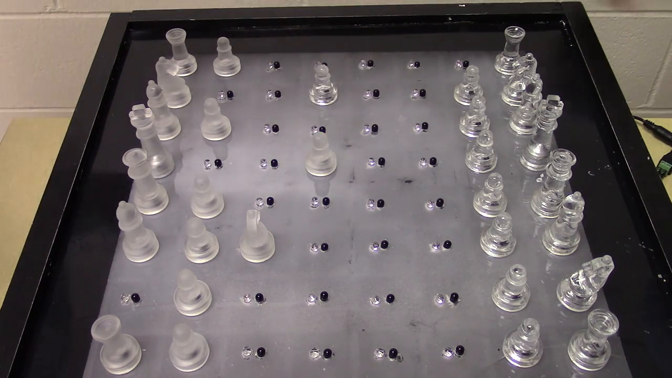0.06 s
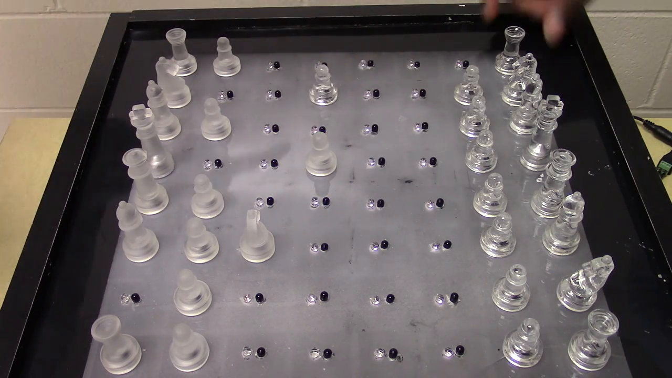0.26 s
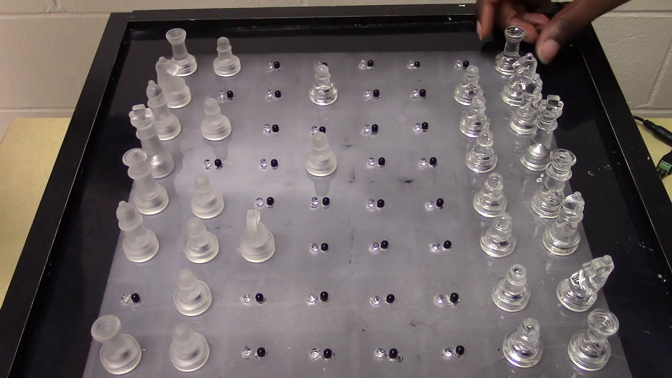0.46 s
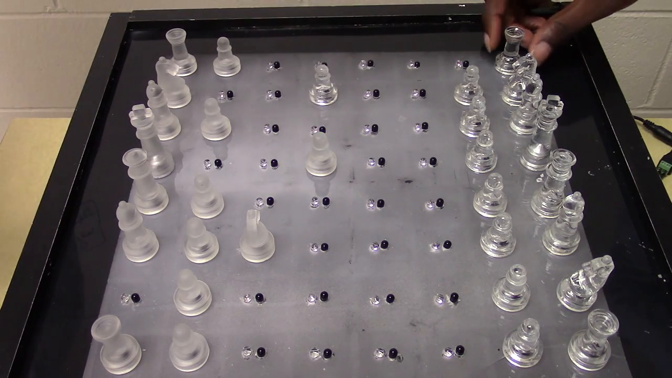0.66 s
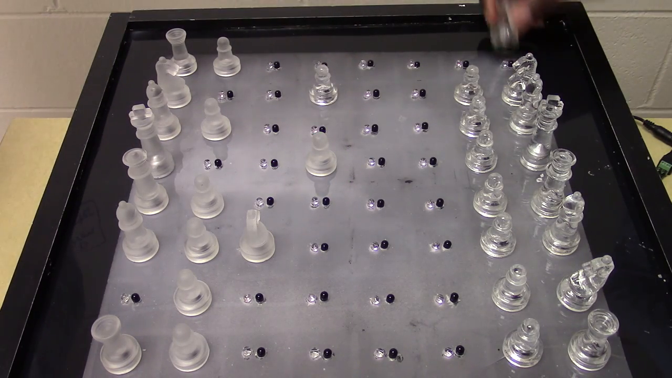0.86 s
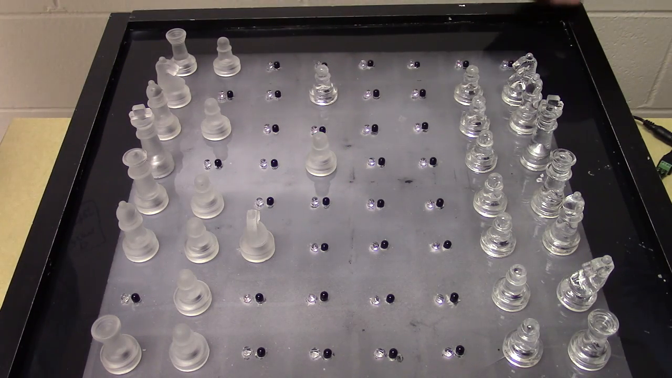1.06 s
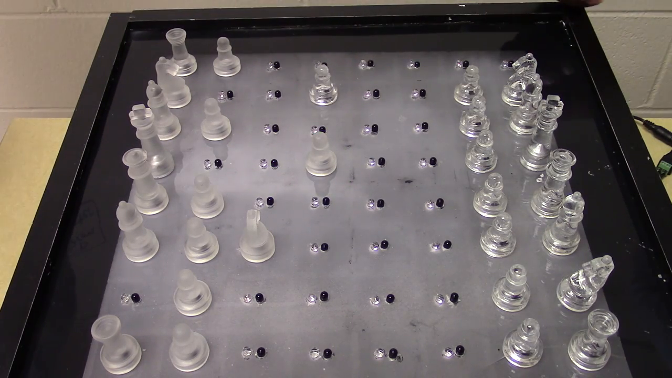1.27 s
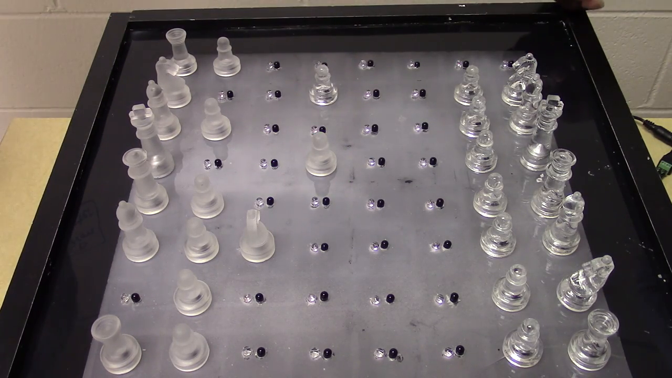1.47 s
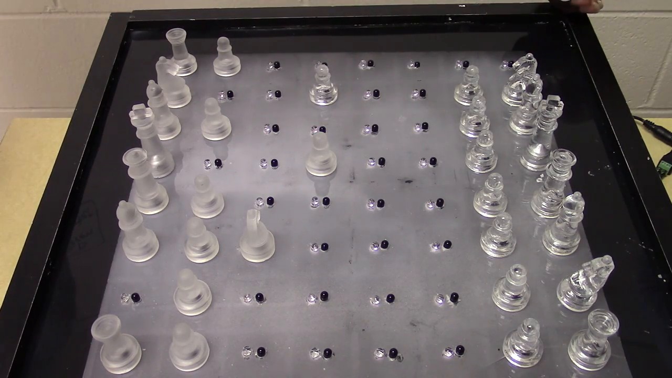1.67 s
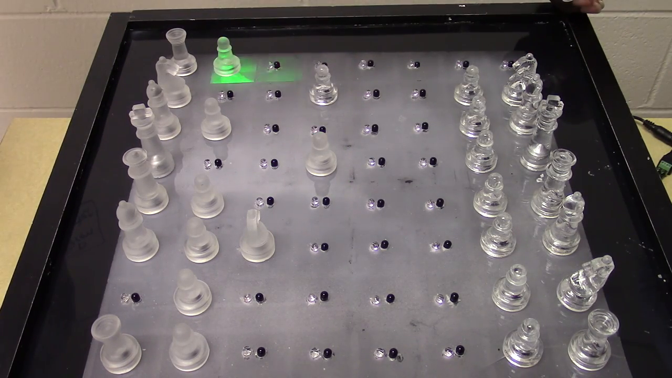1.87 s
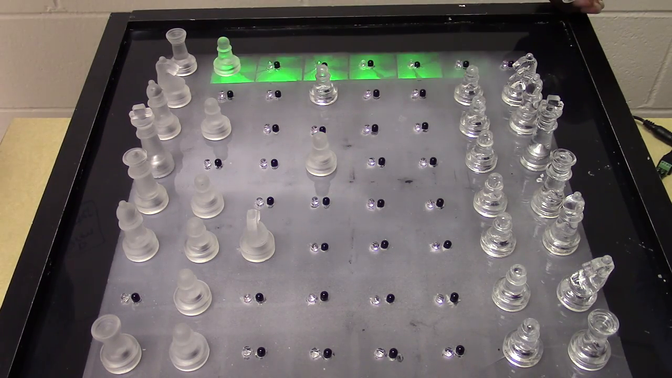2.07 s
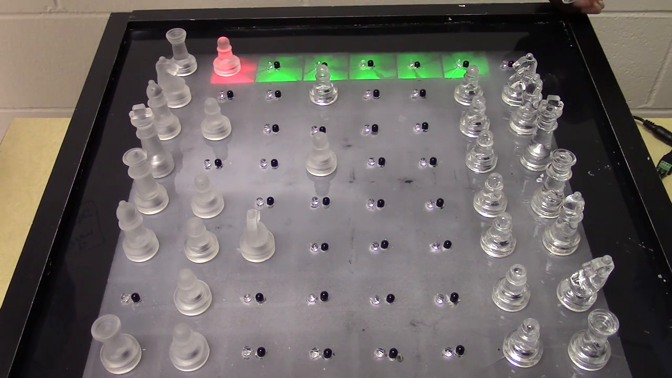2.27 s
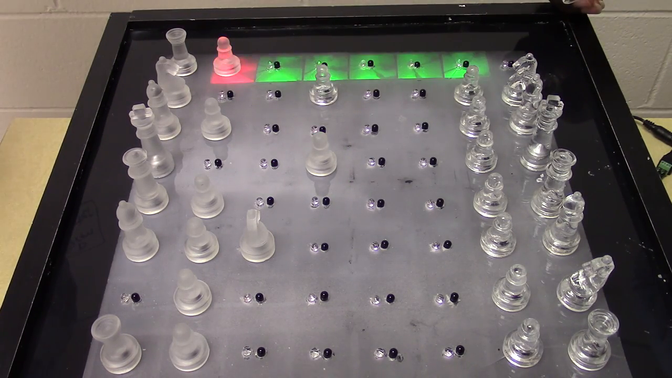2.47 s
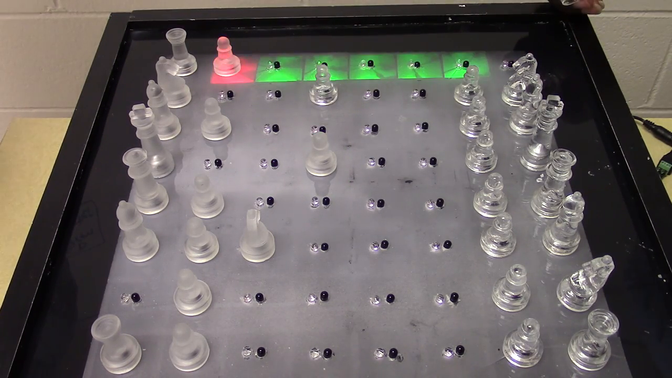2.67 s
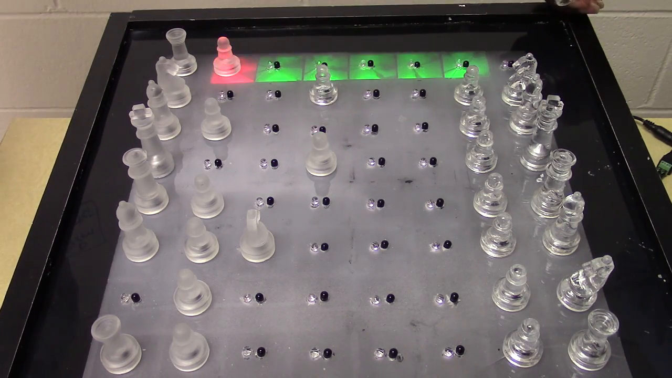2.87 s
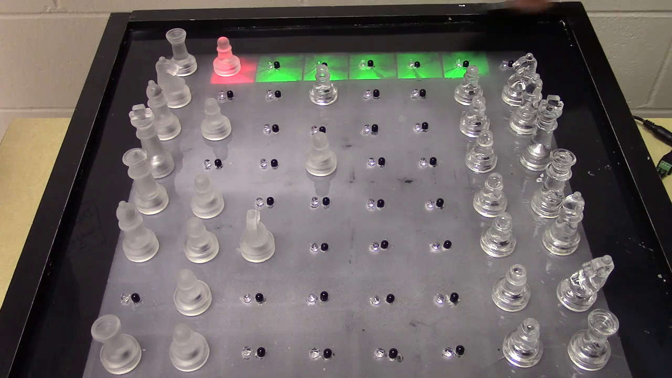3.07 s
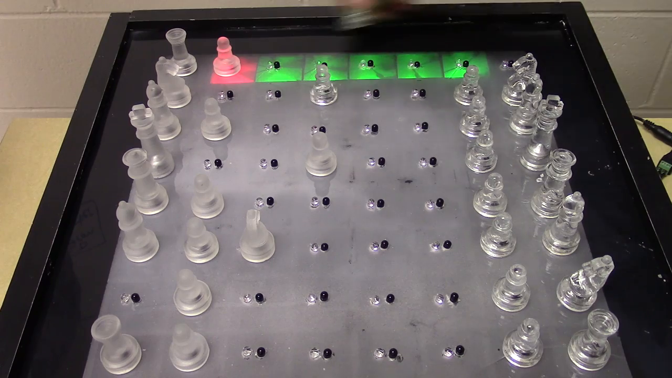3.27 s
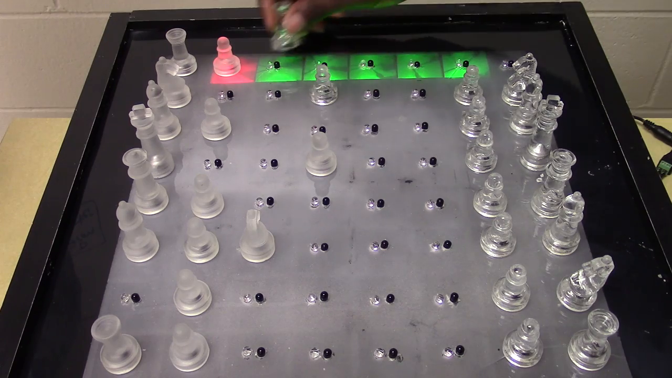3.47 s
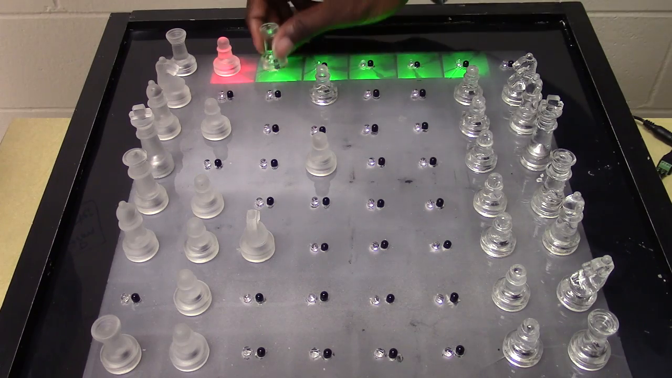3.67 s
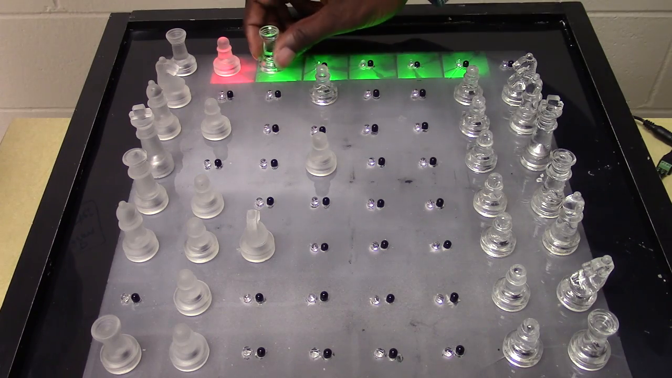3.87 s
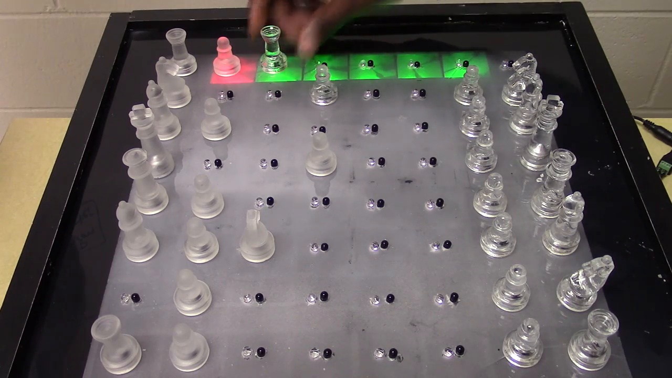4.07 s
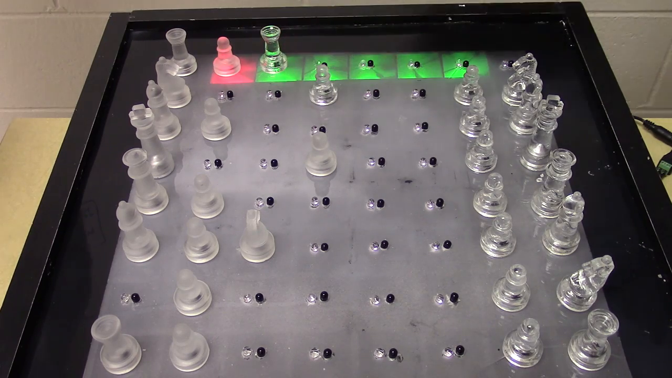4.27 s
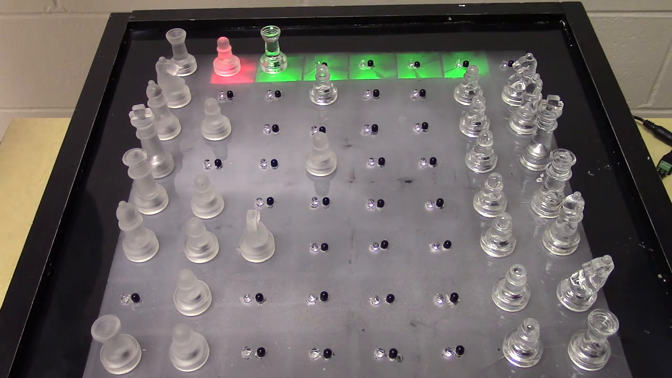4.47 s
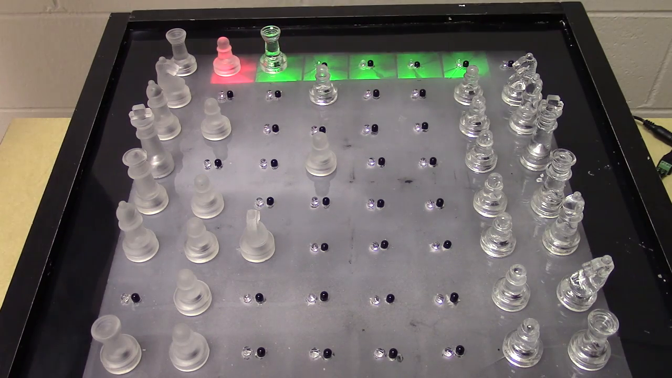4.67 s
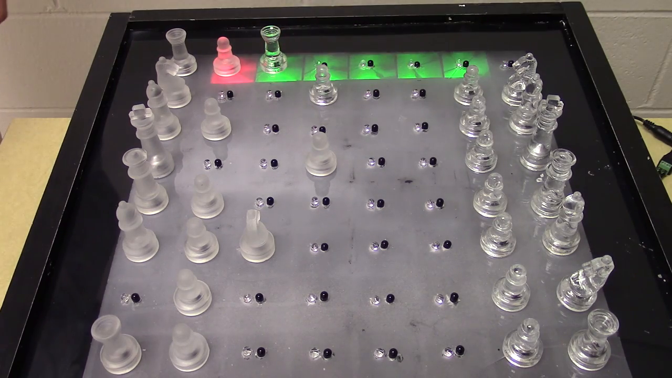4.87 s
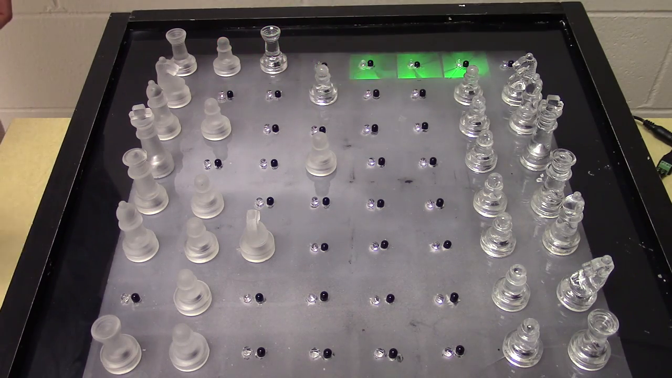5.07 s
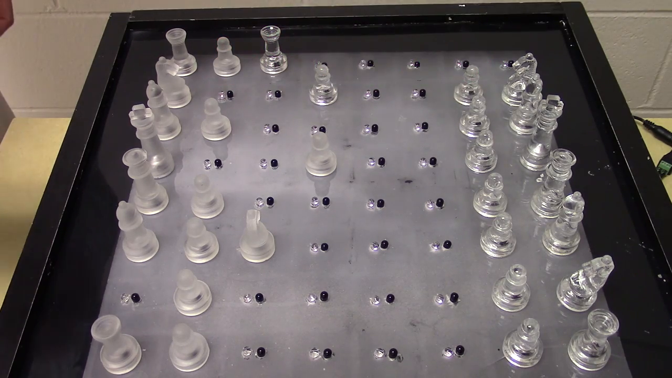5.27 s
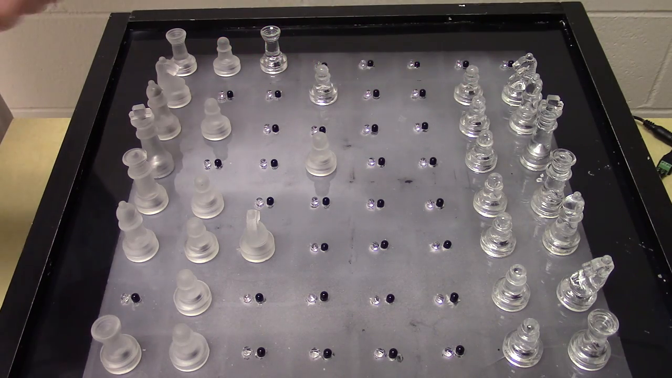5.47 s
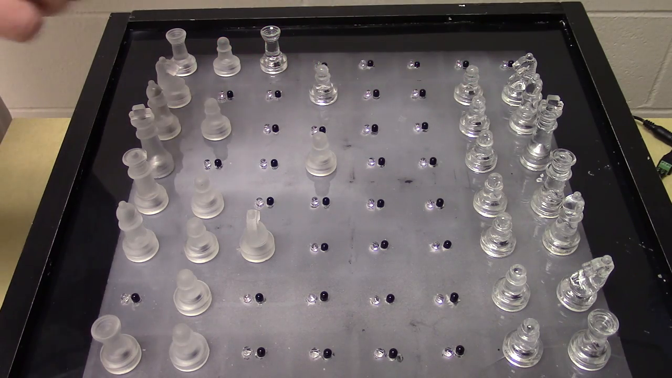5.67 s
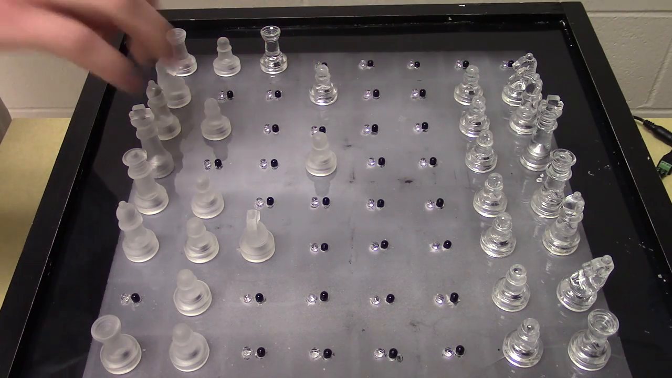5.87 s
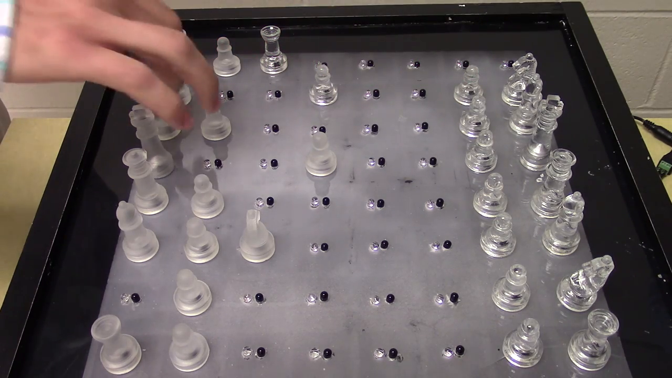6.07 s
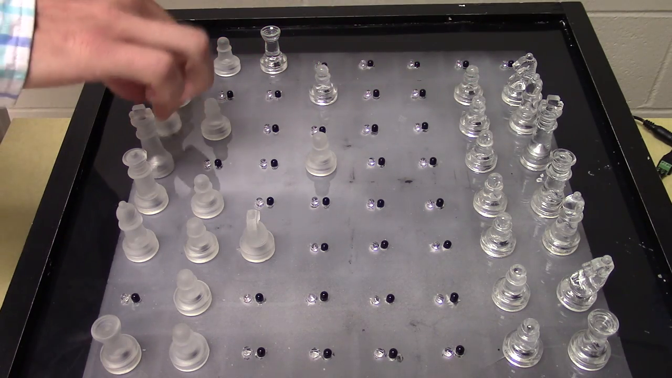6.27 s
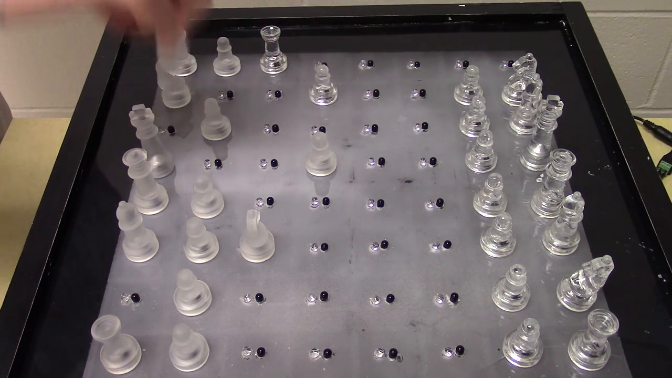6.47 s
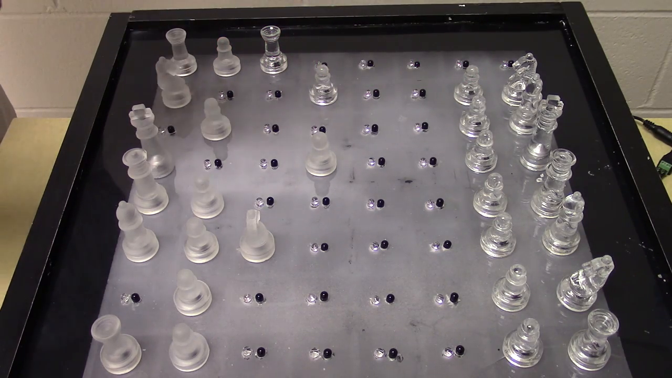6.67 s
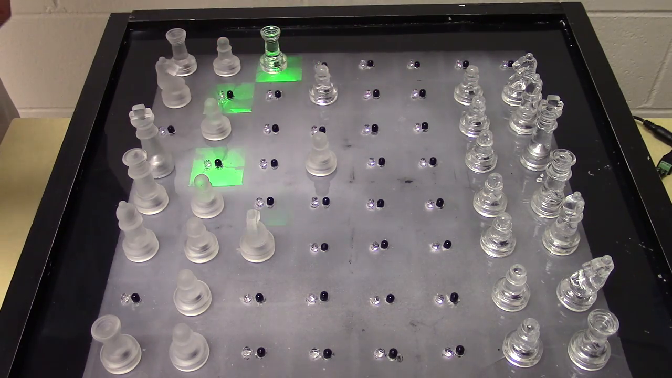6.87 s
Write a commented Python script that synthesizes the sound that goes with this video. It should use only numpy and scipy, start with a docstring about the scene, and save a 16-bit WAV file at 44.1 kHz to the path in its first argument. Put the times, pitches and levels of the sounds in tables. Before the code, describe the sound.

Glass chess piece taps softly, then lands with a sharp hard knock and rocks once; later knocks chatter over room hum and faint sleeve rustle.

```python
"""A glass rook is lifted, set down hard on a glass-topped electronic chess board and rocks once; later
another piece knocks and chatters as it is picked up. Sleeves rustle and small ticks come and go over
mains hum and ventilation in a small room. The knocks are damped modes plus a noisy crack of glass;
handling is short scratchy noise, cloth is shaped noise with a high whistle on quick flicks,
hum is wavering sine lines and the ventilation is shaped noise."""
import sys
import numpy as np
from scipy import signal
from scipy.fft import rfft, irfft
from scipy.io import wavfile

SR = 44100
rng = np.random.default_rng(int(sys.argv[2]) if len(sys.argv) > 2 else 0)


def waveform_to_disk(signal):
    """Save audio, clipped to [-1, 1], as 16-bit WAV at the path in sys.argv[1]."""
    frames = np.transpose(np.atleast_2d(signal))
    scaled = np.clip(frames, -1, 1) * 32767
    samples = np.round(scaled).astype(np.int16)
    wavfile.write(sys.argv[1], SR, samples)


N = 305172  # length in samples
TIME = np.arange(N) / SR
FREQ = np.fft.rfftfreq(N, 1 / SR) + 1e-3  # kept off zero for division

# Colour of ventilation and hiss. Each row: frequency in Hz, relative density in dB per Hz.
AIR_COLOUR = [(25, -33), (50, -19), (92, -22), (112, -1), (170, 1.5), (240, -1.5), (275, -5.5), (360, -5),
              (500, -12), (720, -16), (1000, -20.5), (2500, -26), (8000, -36.5), (15000, -46)]
AIR_DB = -49.5
# Ventilation's side against mid. Each row: frequency in Hz, gain in dB.
AIR_WIDTH = [(30, -11), (60, -2.5), (120, -29), (220, -17.5), (310, -14.5), (450, -9.5), (1000, -6),
             (4000, -9.5), (12000, -13)]
# Mains and fan lines. Each row: frequency in Hz, rms level in dB, waver from 0 to 1.
HUM_LINES = [(58.4, -74.5, 0.9), (119.8, -56.5, 0.76), (229, -56, 0.99), (346, -66.5, 0.59),
             (441, -73, 0.87), (637, -66, 0.97)]

# Colour of cloth on cloth. Each row: frequency in Hz, relative density in dB per Hz.
CLOTH_COLOUR = [(200, -10), (500, 4), (1000, -1), (2000, -6), (3600, -10), (6000, -14.5), (11000, -18.5),
                (15500, -30)]
# Slow arm movements that rub a sleeve. Each row: start in seconds, length in seconds, level in dB.
SLEEVE_RUBS = [(0, 1.29, -62.5), (1.462, 0.36, -61), (2.74, 0.11, -61), (3.06, 0.41, -61),
               (4.346, 0.93, -58.5), (4.795, 0.075, -51)]
RUB_ATTACK_S, RUB_RELEASE_S = 0.021, 0.13
# Threads snagging in the rub: band, level against the rub, spread of their sizes.
SNAG_HZ, SNAG_WIDTH_HZ, SNAG_DB, SNAG_SPREAD_DB = 3380, 2600, -13, 4
# Colour of the weave swishing. Each row: frequency in Hz, relative density in dB per Hz.
SWISH_COLOUR = [(2000, 2), (7000, -1), (11500, -2), (14000, -5), (15500, -13)]
# Quick flicks of the arm. Each row: fastest moment in seconds, half length in seconds, level in dB,
# whistle pitch at the fastest in Hz, whistle level in dB relative to the flick.
ARM_FLICKS = [(1.11, 0.056, -65.5, 11900, -9), (2.817, 0.097, -63.5, 11300, -20),
              (3.068, .045, -60.5, 12100, -18), (3.222, 0.055, -62, 10900, -2),
              (3.318, 0.045, -56.5, 11350, -6)]

# Lone dry ticks of handling. Each row: start in seconds, length in seconds to half amplitude after
# a level in dB, then centre in Hz and the answer of the board's case in dB against the tick.
# The order within a row is start, level, length, centre, answer.
HANDLING_TICKS = [(0.336, -64.5, 0.021, 6000, 4), (0.827, -54, .0033, 2850, 2), (1.512, -51, .004, 7200, 1),
                  (3.032, -54, .0035, 6000, 0), (4.136, -55, 0.0087, 5530, -0.5),
                  (5.024, -60, .008, 3200, 2), (5.196, -49, 0.0049, 9300, 2)]
TICK_WIDTH = 0.44  # bandwidth as a share of the centre
CASE_HZ, CASE_WIDTH_HZ = 1410, 700
# Faint scratchy pairs, like a small button pressed and let go. Each row: press in seconds,
# time held in seconds, press level in dB, release level in dB.
BUTTON_PRESSES = [(1.158, 0.11, -59.5, -60.5), (1.840, 0.096, -65, -60), (3.931, 0.11, -60, -61),
                  (4.266, .074, -62, -63), (6.761, 0.11, -59.5, -62.5)]
BUTTON_HZ, BUTTON_WIDTH_HZ, BUTTON_S, BUTTON_TOP_HZ = 6300, 3000, 0.023, 12000
# Something sliding on the board. Each row: start in seconds, length in seconds, level in dB,
# centre in Hz, width in Hz.
BOARD_SCUFFS = [(0.777, 0.052, -62, 2240, 260), (5.208, .05, -52.5, 560, 400),
                (5.211, 0.033, -59.5, 3000, 3000)]

# Glass on the board. Each row: start in seconds, level in dB, low-pass brightness in Hz, high-pass
# corner in Hz, ring of the struck spot in Hz and its dB, lower ring of the piece in Hz and its dB,
# upper ring in Hz and its dB, t60 of both piece rings in seconds, glass crack in dB,
# change per rebound in dB.
GLASS_KNOCKS = [ (0.8420, -30.5, 3700, 640, 815, 16.5, 2460, -10, 2990, -14, .018, -14.5, -11.5),
                (3.7460, -5.5, 10900, 68, 947, 3.5, 1533, -14, 3250, -2.5, 0.0055, -10, -21),
                (3.8194, -18, 9050, 205, 890, 5.5, 1900, -19, 3120, -10.5, 0.018, -11, -31),
                (3.8283, -37, 1700, 450, 930, 13, 1550, -3, 3150, -7, .005, -23, -20),
                (3.946, -50.5, 1800, 750, 1040, 17, 1800, -6, 2500, -6, .005, -8, -15),
                (4.0581, -40.5, 2400, 500, 885, 12, 1790, -10, 2400, 1, .005, -19, -15.5),
                (5.2095, -44.5, 1300, 430, 557, 17, 825, 16, 2400, -2, 0.0068, -7, -9),
                (6.2588, -30, 1990, 678, 1339, 11.5, 743, -3, 1779, 9, .004, -13.5, -26),
                (6.2635, -46, 1200, 450, 710, 16.5, 950, 4, 2400, -6, .008, -2, -16),
                (6.3320, -29.5, 2960, 1050, 1070, 14, 1664, 5.5, 2520, 6, 0.0064, -15, -20),
                (6.3427, -46, 2600, 800, 1140, 15, 1750, -4, 2400, 3, .006, -20, -20),
                (6.3543, -39, 2380, 900, 1030, 18, 1740, 6, 2400, 1, .005, -11, -26),
                (6.3606, -38.5, 2400, 800, 1100, 14, 1750, 3, 2400, -4, .005, -17, -16),
                (6.3652, -43.5, 2400, 700, 980, 10, 1670, 16, 2390, 9, .005, -13, -20),
                (6.3686, -46.5, 2200, 700, 1130, 17.5, 1700, -4, 2400, -2, .005, -23, -4.5)]
# Modes of the board with a piece on it. Each row: frequency in Hz, level in dB, t60 in seconds.
BOARD_MODES = [(165, -15.5, 0.057), (234, -13, 0.038), (601.4, -5.5, 0.041), (626, 2.2, 0.0093),
               (771, -19, 0.06), (872, -17.5, 0.02), (1088, -11, 0.035), (1244, -9, 0.031),
               (1310, -24, 0.025), (1530, -7.5, 0.021), (1880, -16, 0.023), (2249, -29, 0.015),
               (2570, -25, 0.012), (2780, -30, 0.03), (3290, -20, 0.019), (3255, -5.5, 0.0073),
               (3830, -18, 0.018), (3750, -22, 0.015), (4400, -32.9, 0.011), (4800, -33.8, 0.014),
               (5180, -28, 0.017), (5764, -36, 0.012), (7760, -19.2, 0.01), (8370, -27, 0.012)]
SPOT_T60_S = 0.0097
# Colour of the crack of glass on glass. Each row: frequency in Hz, gain in dB.
CRACK_COLOUR = [(300, -40), (1000, -10), (2200, 6), (3500, 2.5), (4500, -2.5), (5700, -6), (6900, -14.5),
                (7900, -11.5), (11000, -11.5), (14000, -20), (16000, -29)]
# The snap at the first instant of contact; its level adds to that of the crack.
SNAP_HZ, SNAP_DB, SNAP_T60_S = 3060, 6, 0.002
# What the raised frame scatters back. Each row: frequency in Hz, gain in dB.
FRAME_SCATTER = [(200, -17), (450, -10), (850, -16), (1300, -11.5), (2300, -12), (3300, -15.5), (5000, -17),
                 (10000, -21)]
# Chatter: first gap, each gap against the one before, log spread of the gaps and of the spot's pitch.
REBOUND_S, REBOUND_SHRINK, REBOUND_SPREAD, SPOT_SPREAD = 0.0067, 0.86, 0.091, 0.11
REST_DB = -57.5  # below this level the piece has come to rest

# The room's answer. Each row: band centre in Hz, level in dB, t60 in seconds.
ROOM_BANDS = [(170, -12, 0.73), (390, -4, 0.65), (600, -12, 0.8), (850, -17, .65), (1200, -16.5, 0.58),
              (2110, -13.5, 0.6), (3330, -23, 0.52), (4800, -21, 0.52), (8000, -20, 0.33),
              (14000, -20, .15)]
# A low standing wave that booms on after a hard knock.
BOOM_HZ, BOOM_DB, BOOM_T60_S = 161.8, -58.5, 0.89
WALL_S, WALL_DB = 0.0095, -20.5  # early echo
# Close sounds, side against mid. Each row: frequency in Hz, gain in dB.
NEAR_WIDTH = [(100, -49), (320, -57), (600, -59), (1200, -31), (3000, -25), (12000, -18)]
TOP_HZ = 15700


def undb(db):
    """Decibels to gain."""
    return 10 ** (np.asarray(db) / 20)


def unit(x):
    """Scale to rms 1."""
    return x / np.sqrt(np.mean(x ** 2))


def colour(x, points):
    """Shape a sound's spectrum by (Hz, dB) points, joined along log frequency."""
    hz, db = np.transpose(points)
    f = np.fft.rfftfreq(len(x), 1 / SR) + 1e-3
    gain = undb(np.interp(np.log(f), np.log(hz), db))
    return irfft(rfft(x) * gain, len(x))


def edge(x, hz, kind, order=2):
    """Causal low-pass or high-pass."""
    return signal.sosfilt(signal.butter(order, hz, kind, fs=SR, output="sos"), x)


def band_noise(hz, width_hz):
    """Noise in one steep-sided resonance, rms 1."""
    detuning = (FREQ - hz ** 2 / FREQ) / width_hz
    return unit(irfft(rfft(rng.standard_normal(N)) / (1 + detuning ** 2), N))


def fade(t, t60):
    """Exponential decay, 60 dB down at t60."""
    return np.exp(-np.log(1000) * t / t60)


def ring(t, hz, db, t60):
    """One damped mode."""
    return undb(db) * np.sin(2 * np.pi * hz * t) * fade(t, t60)


def burst(length, t60, start=0):
    """A dying cluster of random reflections with unit energy."""
    t = np.arange(length) / SR
    x = rng.standard_normal(length) * fade(t, t60) * (t >= start)
    return x / np.linalg.norm(x)


def scratch(length, hz, width_hz, grit=0.82):
    """Resonant noise with grains of uneven size, falling to half amplitude at its length in seconds."""
    t = np.arange(SR // 8) / SR
    noise, size = rng.standard_normal((2, len(t)))
    b, a = signal.iirpeak(hz, hz / width_hz, fs=SR)
    rasp = unit(signal.lfilter(b, a, noise * np.exp(grit * size)))
    return rasp / (1 + (t / length) ** 4)


def add(track, s, sound):
    """Mix a sound into a track at time s."""
    i = int(s * SR)
    track[i:i + len(sound)] += sound[:N - i]


def air():
    """Ventilation rumble running out into hiss, as shaped noise."""
    return undb(AIR_DB) * unit(colour(rng.standard_normal(N), AIR_COLOUR))


def hum(waver_hz=5.1):
    """Mains and fan lines: steady sines mixed with narrow noise, so strength and phase waver."""
    out = np.zeros(N)
    for hz, db, waver in HUM_LINES:
        steady = np.sqrt(2) * np.sin(2 * np.pi * (hz * TIME + rng.random()))
        wavering = band_noise(hz, 2 * waver_hz)
        out += undb(db) * (np.sqrt(1 - waver ** 2) * steady + waver * wavering)
    return out


def sleeves(catch_db=0.6, swish_db=-4, whistle_width_hz=1100, whistle_bend=0.02):
    """Cloth rubs broadly and catches unevenly; a quick flick makes the weave swish and whistle high up."""
    power = np.zeros(N)
    for s, length, db in SLEEVE_RUBS:
        attack = 1 - np.exp(-np.maximum(TIME - s, 0) / RUB_ATTACK_S)
        release = np.exp(-np.maximum(TIME - s - length, 0) / RUB_RELEASE_S)
        power += (undb(db) * attack * release) ** 2
    snag_sizes = undb(SNAG_SPREAD_DB * band_noise(95, 200))
    snags = unit(band_noise(SNAG_HZ, SNAG_WIDTH_HZ) * snag_sizes)
    cloth = unit(colour(rng.standard_normal(N), CLOTH_COLOUR))
    out = (cloth + undb(SNAG_DB) * snags) * np.sqrt(power)

    swish = undb(swish_db) * unit(colour(rng.standard_normal(N), SWISH_COLOUR))
    unevenness = unit(edge(rng.standard_normal(N), whistle_width_hz / 2, "low"))
    for s, half_s, db, hz, whistle_db in ARM_FLICKS:
        # the arm speeds up and slows down; threads pass each other at a nearly even rate
        speed = 1 / (1 + np.abs((TIME - s) / half_s) ** 3)
        pitch = hz * (1 + whistle_bend * (speed - 1))
        whistle = np.sqrt(2) * unevenness * np.sin(2 * np.pi * np.cumsum(pitch) / SR)
        out += undb(db) * speed * (swish + undb(whistle_db) * whistle)
    catching = undb(catch_db * band_noise(20, 60))
    return out * catching


def ticks():
    """Lone scratchy ticks, each stirring a short resonance of the board's case."""
    out = np.zeros(N)
    for s, db, length, hz, case_db in HANDLING_TICKS:
        tick = scratch(length, hz, TICK_WIDTH * hz)
        case = undb(case_db) * scratch(length, CASE_HZ, CASE_WIDTH_HZ)
        add(out, s, undb(db) * (tick + case))
    return out


def buttons():
    """The same kind of small scrape on the way down and on the way up."""
    out = np.zeros(N)
    for s, held_s, press_db, release_db in BUTTON_PRESSES:
        for at, db in ((s, press_db), (s + held_s, release_db)):
            add(out, at, undb(db) * scratch(BUTTON_S, BUTTON_HZ, BUTTON_WIDTH_HZ))
    return edge(out, BUTTON_TOP_HZ, "low")


def scuffs():
    """Brief slides on the board, each a thin resonant rasp."""
    out = np.zeros(N)
    for s, length, db, hz, width_hz in BOARD_SCUFFS:
        add(out, s, undb(db) * scratch(length, hz, width_hz))
    return out


def knocks(crack_s=0.0041, scatter_t60=0.086, count=4):
    """Contacts snap and ring piece, spot and board, rebound ever weaker, and scatter from the frame."""
    t = np.arange(SR // 4) / SR
    # neighbouring modes swing in opposite directions
    board = sum((-1) ** k * ring(t, *mode) for k, mode in enumerate(BOARD_MODES))
    snap = ring(t, SNAP_HZ, SNAP_DB, SNAP_T60_S)
    # the base grinds on the glass for a few milliseconds, then sits still
    grinding = 1 / (1 + (t / crack_s) ** 3)
    out, scattered = np.zeros(N), np.zeros(N)
    for (s, db, bright_hz, low_hz, spot_hz, spot_db, lower_hz, lower_db,
         upper_hz, upper_db, piece_t60, crack_db, rebound_db) in GLASS_KNOCKS:
        piece = ring(t, upper_hz, upper_db, piece_t60) + ring(t, lower_hz, lower_db, piece_t60)
        hz = spot_hz
        for k, (late, shift) in enumerate(rng.standard_normal((count, 2))):
            contact_db = db + k * rebound_db
            if contact_db < REST_DB:
                break
            crack = colour(rng.standard_normal(len(t)), CRACK_COLOUR) * grinding
            spot = ring(t, hz, spot_db, SPOT_T60_S)
            body = board + piece + spot + undb(crack_db) * snap
            body = edge(edge(body, bright_hz, "low", order=6), low_hz, "high")
            blow = undb(contact_db) * (body + undb(crack_db) * crack)
            # the board's raised frame scatters the blow back just after it
            scatter = colour(burst(len(t), scatter_t60, start=0.0027), FRAME_SCATTER)[:len(t) // 2]
            add(out, s, blow)
            add(scattered, s, signal.fftconvolve(blow, scatter))
            # the next contact lands on another part of the rim
            s = s + REBOUND_S * REBOUND_SHRINK ** k * np.exp(REBOUND_SPREAD * late)
            hz = spot_hz * np.exp(SPOT_SPREAD * shift)
    # the knocks' deep bass is cut steeply below about 119 Hz
    return edge(np.array([out, scattered]), 119, "high", order=6)


def room(x, build_s=0.0026):
    """A diffuse noise tail that builds up quickly; each band dies at its own rate."""
    t = np.arange(SR) / SR
    log_f = np.log(np.fft.rfftfreq(SR, 1 / SR) + 1e-3)
    noise = rfft(rng.standard_normal(SR))
    centres = np.log([row[0] for row in ROOM_BANDS])
    tail = np.zeros(SR)
    # each row of the identity picks one band, crossfading into its neighbours
    for share, (hz, db, t60) in zip(np.eye(len(ROOM_BANDS)), ROOM_BANDS):
        band = irfft(noise * np.interp(log_f, centres, share), SR)
        envelope = fade(t, t60) * (1 - np.exp(-(t / build_s) ** 2))
        tail += undb(db) * band * envelope / np.linalg.norm(envelope)
    return signal.fftconvolve(x, tail)[:N]


def boom(x):
    """The room's low standing wave, one long damped mode driven by the sound."""
    return signal.fftconvolve(x, ring(TIME[:SR], BOOM_HZ, BOOM_DB, BOOM_T60_S))[:N]


def scene(room_side_db=-16):
    """Everything lies ahead of a close microphone pair; reflections and air give a little width."""
    blows, scattered = knocks()
    direct = blows + scuffs() + ticks() + buttons() + sleeves()
    # the wall just behind the board throws back one early echo
    add(direct, WALL_S, undb(WALL_DB) * direct)
    mid = direct + scattered + room(direct) + boom(direct) + air() + hum()

    sideways = signal.fftconvolve(direct, burst(SR // 20, 0.0055))[:N]
    side = colour(sideways, NEAR_WIDTH)
    side += undb(room_side_db) * room(direct)
    side += colour(air(), AIR_WIDTH)
    balance = undb(np.array([[0.13], [-0.13]]))  # left a touch louder
    return np.array([mid + side, mid - side]) * balance


def record(dry):
    """The recorder cuts the top steeply with an elliptic low-pass."""
    return signal.sosfilt(signal.ellip(8, 0.2, 70, TOP_HZ, fs=SR, output="sos"), dry)


dry = scene()
out = record(dry)
waveform_to_disk(out)
```